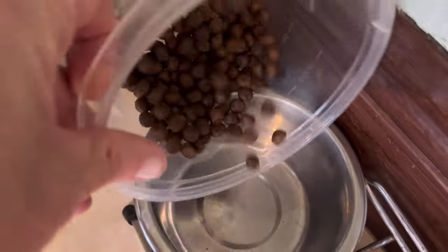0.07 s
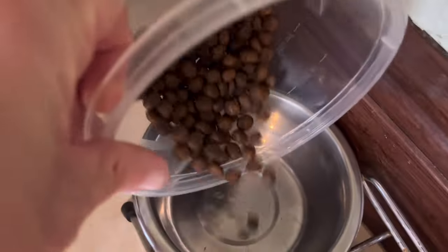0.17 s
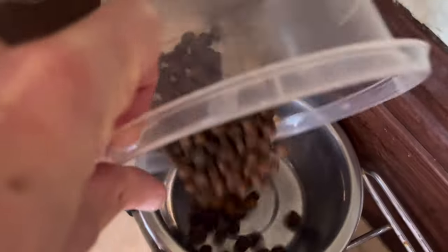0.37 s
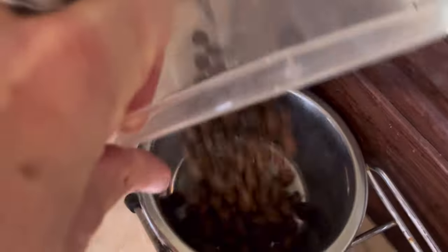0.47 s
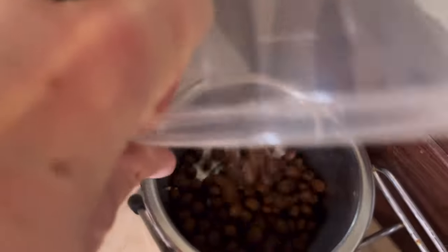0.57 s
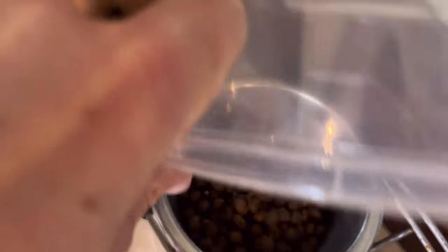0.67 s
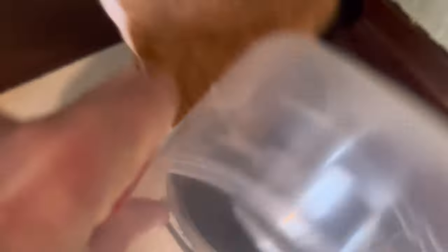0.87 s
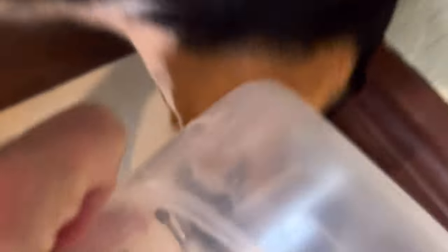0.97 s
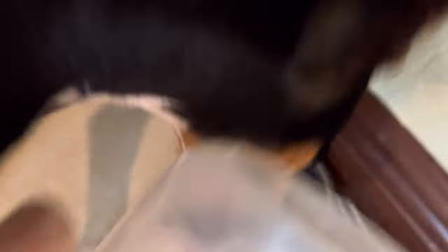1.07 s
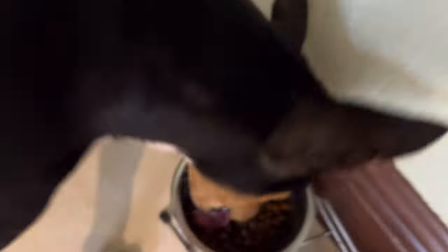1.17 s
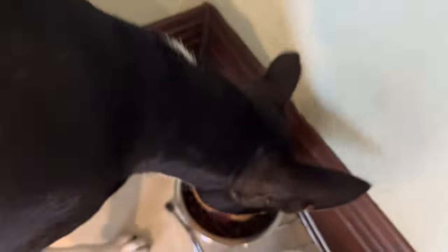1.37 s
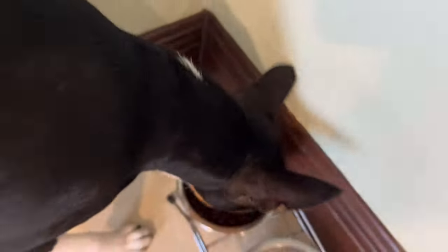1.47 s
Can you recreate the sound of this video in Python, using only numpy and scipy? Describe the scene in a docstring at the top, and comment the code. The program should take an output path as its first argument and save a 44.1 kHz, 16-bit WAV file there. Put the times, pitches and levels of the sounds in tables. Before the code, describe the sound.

Close up in a small room, dry pet food pours from a plastic container into a metal bowl with a ringing rattle. Light plastic ticks and soft thuds follow, then a few faint clicks as a dog stirs the food.

```python
"""In a small room, close by, dry kibble slides down a plastic tub and pours into a steel bowl.
The bare bowl rings until the growing heap damps it and only the rattle of pellet on pellet is left.
The tub is swung away with a few ticks and soft bumps, and a dog starts to nose through the food.
Faint room air, a low rumble and a hum lie underneath."""
import sys
import numpy as np
from scipy import signal
from scipy.fft import rfft, irfft
from scipy.io import wavfile
from scipy.ndimage import uniform_filter1d

SR = 44100
rng = np.random.default_rng(int(sys.argv[2]) if len(sys.argv) > 2 else 0)


def bounce(signal):
    """Save signal as a 16-bit WAV file at the path given by the first command-line argument."""
    frames = np.transpose(np.atleast_2d(signal))
    limited = np.clip(frames, -1, 1)
    pcm = np.round(limited * 32767).astype(np.int16)
    wavfile.write(sys.argv[1], SR, pcm)


N = 66150
T = np.arange(N) / SR

# How loud each sound is as time goes by. Each row: time in seconds, level in dB.
SLIDE_LEVEL = [(0, -27), (.05, -38.5), (.12, -29.5), (.2, -28), (.3, -27.5), (.55, -85), (.7, -70)]  # pellets sliding in the tub
RUMBLE_LEVEL = [(0, -42), (.32, -47), (.4, -62), (.75, -60.5), (.9, -37), (1.08, -47.5), (1.28, -44.5),
                (1.5, -48.5)]  # the low rumble and hum
HEAP_LEVEL = [(.277, -46), (.281, -21), (.31, -41), (.34, -28.5), (.38, -21), (.44, -19.5), (.51, -17.5),
              (.57, -20), (.645, -21), (.70, -34), (.77, -38), (1.05, -54)]  # pellets landing and settling
GRAZE_LEVEL = [(.277, -50), (.281, -20), (.31, -35), (.34, -21), (.38, -31.5), (.43, -24.5), (.5, -23),
               (.56, -27), (.64, -26.5), (.7, -45), (.78, -63)]  # pellets grazing each other
FILLED_LEVEL = [(.42, -60), (.52, -36), (.63, -30.5), (.72, -37.5), (.8, -39), (1.05, -56.5)]  # pellets shaking the filled bowl
STEEL_LEVEL = [(.279, 0.5), (.31, 5.5), (.34, 5.5), (.45, -1.5), (.52, -0.5), (.64, -8.5), (.72, -21.5)]  # pellets striking bare steel
RUMMAGE_LEVEL = [(1.24, -53), (1.29, -42.5), (1.315, -51), (1.34, -39.5), (1.4, -76), (1.43, -34),
                 (1.455, -51), (1.485, -35.5)]  # the dog stirring the food

# The tone of each sound, from bass to treble. Each row: frequency in Hz, relative level in dB.
SLIDE_TONE = [(88, -49), (150, -32), (204, -15), (401, -6.5), (714, 1), (1130, -1.5), (1490, -10),
              (2020, -0.5), (3750, -13), (6300, -18), (7940, -25.5), (11500, -24.5), (15000, -39)]
AIR_TONE = [(80, -33), (170, -8), (450, -18), (850, -6.5), (1200, -17), (4000, -22.5), (12500, -41.5),
            (15000, -57)]
RUMBLE_TONE = [(25, -50), (58, 1.5), (90, -2.5), (170, -13.5), (300, -15.5), (800, -46.5)]
HEAP_TONE = [(300, -56.5), (691, 4), (1130, -5), (1310, 3), (1470, -13.5), (2140, 7), (2690, -6.5),
             (2970, -4.5), (5800, 2), (7920, -4.5), (8600, -40), (9800, -7.5), (12900, -16), (15000, -34)]
GRAZE_TONE = [(3000, -40), (7000, -25), (8600, -16.5), (9900, 2), (10700, -14.5), (11600, 0), (12800, -3.5),
              (14200, -13.5), (15500, -52)]
SKID_TONE = [(300, -21), (600, 8), (2000, 0), (6000, -3.5), (11000, -7), (15500, -28)]
RUMMAGE_TONE = [(290, -56), (720, -32), (1140, 5), (1650, -5), (2100, -4.5), (4740, -11.5), (8250, -23.5),
                (11900, -26), (15000, -52)]

# The room's echo. Each row: frequency in Hz, fade time in seconds (the time to fall by 60 dB).
ROOM_FADE = [(150, 0.36), (5000, 0.44), (14000, 0.17)]
# Ticks of the plastic tub. Each row: start in seconds, level in dB, pitch in Hz.
TUB_TICKS = [(0.0177, -27, 730), (0.0928, -28.5, 2860), (.1278, -26, 2730), (0.1371, -28.5, 745),
             (0.222, -21.5, 2730), (0.2444, -15.5, 2580), (.817, -29.5, 2270), (0.908, -34, 2280),
             (.946, -31, 2230), (.973, -37, 2320), (1.0144, -36, 2470), (1.0385, -41, 2560),
             (1.119, -35.5, 650)]
# The tone of one tick. Each row: multiple of its pitch, relative level in dB.
TICK_TONE = [(.1, -11), (.48, 0), (.68, -6), (1, 6), (1.35, -4.5), (2, -15), (4.6, -23), (6, -43)]
# Hard single landings. Each row: start in seconds, level in dB, pitch the struck spot favours in Hz.
LANDINGS = [(.2795, -17, 1722), (.331, -20, 666), (.345, -21, 4700), (.399, -21, 2925), (.447, -21, 1722),
            (.469, -21, 1722), (.533, -21, 5800), (.583, -20, 666), (.6215, -15, 5856), (.68, -26, 941)]
# Dull notes of the filled bowl. Each row: pitch in Hz, relative level in dB.
FILLED_NOTES = [(1272, 9), (4430, 6.5), (5820, -4.5)]
# Which way the heap's rattle leans. Each row: frequency in Hz, left minus right in dB.
HEAP_BALANCE = [(700, -6), (1300, -2.5), (2200, -3), (4300, 4.5), (5700, 3), (7500, -2), (9800, 1.5),
                (12000, 4)]
# Notes of the bare bowl. Each row: pitch in Hz, relative level in dB, left minus right in dB.
STEEL_NOTES = [(666, -6, -7), (941, -10, -5), (1722, 2.5, -1), (2887, -6, -3), (2966, -7, 3),
               (3077, -9, -4), (4064, -3, 10), (4612, 0, 9), (4847, 0, 5), (5014, -5, -1), (5622, -11, 7),
               (5760, -8, -4), (5856, -2, 2), (6384, -7, 11), (7673, -11, 3), (7921, -12, 1)]
# Handling bumps. Each row: start in seconds, level in dB, final pitch in Hz, fade time in seconds.
BUMPS = [(0.841, -29.5, 62.2, 0.32), (.863, -21, 82.3, 0.13), (.916, -8.5, 88, 0.072),
         (0.97, -24, 62.7, 0.1)]
# Pellets knocked about by the dog. Each row: start in seconds, level in dB, pitch in Hz.
NUDGES = [(1.2834, -28.5, 2094), (1.3309, -33, 3320), (1.3576, -25, 4200), (1.396, -40, 1370),
          (1.4365, -35, 2160), (1.47, -34, 1145), (1.4965, -25.5, 1930)]

HEAP_PER_S, HEAP_SPREAD_DB = 1800, 1.5  # hits a second, and how much their strength varies


def amp(db):
    """Turns decibels into a number to multiply by."""
    return 10 ** (np.asarray(db) / 20)


def unit(x):
    """Scales a sound to an average power of 1."""
    return x / np.sqrt(np.mean(x ** 2) + 1e-20)


def read(points, hz):
    """Looks up a frequency in a table, giving every octave equal room."""
    row_hz, value = np.transpose(points)
    return np.interp(np.log(hz + 1), np.log(row_hz), value)


def level(points):
    """Turns a level table into a volume curve that dies away fast beyond its ends."""
    times, db = np.transpose(points)
    outside_s = abs(T - np.clip(T, times[0], times[-1]))
    return amp(np.interp(T, times, db) - 300 * outside_s)


def pan(db):
    """Left and right volumes; above 0 dB the sound leans left."""
    return amp(np.array([[db], [-db]]) / 2)


def add(mix, start_s, sound):
    """Mixes a sound in at a given time."""
    part = mix[:, max(round(start_s * SR), 0):][:, :sound.shape[-1]]
    part += sound[..., :part.shape[1]]


def widen(pair, width=1):
    """Makes left and right from a shared signal and one that is added left and taken away right."""
    middle, side = pair[0], width * pair[1]
    return np.array([middle + side, middle - side]) / np.sqrt(1 + width ** 2)


def ring_through(x, response):
    """Makes every sample of a sound set off the given response."""
    return signal.fftconvolve(x, np.atleast_2d(response), axes=1)[:, :N]


def colour(x, tone, peak_hz=1000, peak_db=0, peak_octaves=0.05, size=4096):
    """Gives a sound the tone in a table, with one narrow ringing peak if asked."""
    hz = abs(np.fft.fftfreq(size, 1 / SR))
    db = read(tone, hz) + peak_db / (1 + (np.log2((hz + 1) / peak_hz) / peak_octaves) ** 2)
    spectrum = np.exp(np.conj(signal.hilbert(np.log(amp(db)))))  # rings after a hit, never before
    response = np.fft.ifft(spectrum).real[:size // 2]
    return ring_through(x, response / np.linalg.norm(response))


def impacts(per_s, spread_db):
    """Random hits, a few harder than the rest, at a steady average power."""
    strength = amp(spread_db * np.minimum(rng.exponential(1, N), 3.5))
    hits = strength * rng.choice([-1, 1], N) * (rng.random(N) < per_s / SR)
    return hits / np.sqrt(abs(uniform_filter1d(hits ** 2, size=1500)) + 1e-6)


def patter(per_s, spread_db, spots=6):
    """Hits from scattered spots, each sounding a little different on the left and right."""
    out = np.zeros((2, N))
    hits, spot = impacts(per_s, spread_db), rng.integers(0, spots, N)
    for k in range(spots):
        here = hits * (spot == k)
        shifted = np.roll(here, (k + 1) * (-1) ** k) * (-1) ** (k // 2)
        out += widen([here, shifted])
    return out


def click(fade_s, size=3000):
    """A sharp contact and its brief chatter."""
    t = np.arange(size) / SR
    burst = rng.standard_normal((2, size)) * amp(-60 * t / fade_s)
    burst[0, 0] += 4  # the contact itself
    return unit(widen(burst)) * np.sqrt(SR / 200 / size)  # as much energy as 5 ms at power 1


def tub():
    """Pellets tumble down the plastic wall, which ticks dully."""
    out = colour(patter(per_s=1100, spread_db=1) * level(SLIDE_LEVEL), SLIDE_TONE)
    for start, db, hz in TUB_TICKS:
        tone = [(multiple * hz, tone_db) for multiple, tone_db in TICK_TONE]
        add(out, start, amp(db) * colour(click(fade_s=.022), tone))
    return out * pan(db=-2)


def background(air_db=-52.5, hum_hz=120.3):
    """Steady room air, plus a low rumble and faint hum that sink during the pour."""
    air, low = (widen(rng.standard_normal((2, N)), width=0.45) for _ in range(2))
    hum = amp(-4) * unit(np.sin(2 * np.pi * hum_hz * T))
    return amp(air_db) * colour(air, AIR_TONE) + level(RUMBLE_LEVEL) * (colour(low, RUMBLE_TONE) + hum)


def room_echo(x, delay_s=0.00226, size=256):
    """The walls send back a short blur of echoes whose highest treble dies first."""
    hz, t, noise = signal.stft(rng.standard_normal((2, SR // 2)), SR, nperseg=size)
    fade = amp(-60 * t / read(ROOM_FADE, hz)[:, None])
    tail = signal.istft(noise * fade, SR, nperseg=size)[1]
    tail = tail * (T[:tail.shape[1]] > delay_s)
    return ring_through(x, tail / np.linalg.norm(tail[0]))


def heap():
    """Pellets land on pellets with a rattle and graze each other with a crisp hiss."""
    hits = patter(HEAP_PER_S, HEAP_SPREAD_DB) * level(HEAP_LEVEL)
    for start, db, _ in LANDINGS:
        add(hits, start, amp(db) * click(fade_s=0.027))
    grazes = patter(HEAP_PER_S, HEAP_SPREAD_DB) * level(GRAZE_LEVEL)
    rattle = colour(hits, HEAP_TONE) + colour(grazes, GRAZE_TONE)
    out = steel_shimmer(rattle) + filled_bowl()
    lean_db = read(HEAP_BALANCE, np.fft.rfftfreq(N, 1 / SR))
    return irfft(rfft(out) * amp(np.array([lean_db, -lean_db]) / 2), N)


def steel_shimmer(x, relative_db=-8.5, fade_s=0.054):
    """The steel wall adds a crowd of close, quickly dying notes to a sound."""
    t = T[:SR // 8]
    ring = widen(rng.standard_normal((2, len(t)))) * amp(-60 * t / fade_s)
    shimmer = ring_through(x, ring / np.linalg.norm(ring[0]))
    return (x + amp(relative_db) * shimmer) / np.hypot(1, amp(relative_db))


def bare_bowl(ring_db=-24.5, damping_per_s=9, spot_octaves=.06):
    """Each pellet strikes another spot and sets the steel ringing; the growing heap damps it."""
    first_s = LANDINGS[0][0]
    hits = impacts(per_s=600, spread_db=2.5) * level(STEEL_LEVEL) * (T >= first_s)
    typical_hit = np.sqrt(SR / 600)
    first_hit = amp(18) * typical_hit * (np.arange(N) == round(first_s * SR))
    # This clock speeds up as the bowl fills, so the notes fade ever faster.
    fade_clock = np.cumsum(1 + damping_per_s * np.clip(T - first_s, 0, .5)) / SR
    out = np.zeros((2, N))
    for hz, db, side_db in STEEL_NOTES:
        empty_fade_s = .55 * (hz / 1e3) ** -.12  # high notes die sooner
        decay = np.minimum(np.log(1000) * fade_clock / empty_fade_s, 600)
        note = np.exp(2j * np.pi * hz * T - decay)
        push = hits * rng.standard_normal(N) + first_hit
        for start, hit_db, spot_hz in LANDINGS:
            off_pitch = np.log2(hz / spot_hz) / spot_octaves
            push[round(start * SR)] += amp(hit_db + 34) * typical_hit / (1 + off_pitch ** 2)
        ring = note * np.cumsum(push / abs(note))  # every push starts its own fade
        shift_s = .00009 * rng.uniform(-0.87, 0.51, (2, 1))  # left and right arrive slightly apart
        stereo = (ring * np.exp(2j * np.pi * hz * shift_s)).real
        out += amp(db) * unit(stereo * pan(side_db))
    return amp(ring_db) * unit(out)


def filled_bowl(fade_s=.025):
    """Weighed down with food, the bowl answers each hit with short, dull notes."""
    t = T[:SR // 4]
    fade = amp(-60 * t / fade_s)
    notes = sum(amp(db) * unit(fade * np.sin(2 * np.pi * hz * t)) for hz, db in FILLED_NOTES)
    hits = patter(HEAP_PER_S, HEAP_SPREAD_DB) * level(FILLED_LEVEL)
    return ring_through(hits, notes / np.linalg.norm(notes))


def skid(peak_s=.832, width_s=0.0067, db=-30.5):
    """A last pellet skids over the plastic in a quick run of tiny hits."""
    swell = amp(db) * np.exp(-.5 * ((T - peak_s) / width_s) ** 2)
    return colour(patter(HEAP_PER_S, HEAP_SPREAD_DB) * swell, SKID_TONE)


def bumps(rise_s=0.0056, drop_s=0.0034):
    """Handling makes soft, low thuds whose pitch drops at once."""
    out, t = np.zeros((2, N)), T[:SR // 4]
    side_radians = np.array([[.5], [-.5]])  # the left wave runs ahead of the right
    for start, db, hz, fade_s in BUMPS:
        cycles = np.cumsum(hz * (1 + 2.4 * np.exp(-t / drop_s))) / SR
        volume = amp(db - 60 * t / fade_s) * (1 - np.exp(-t / rise_s))
        add(out, start, -np.sin(2 * np.pi * cycles + side_radians) * volume)
    return out * pan(db=3.5)


def dog():
    """A muzzle pushes pellets around the full bowl, and a few of them click."""
    out = colour(patter(per_s=1100, spread_db=3) * level(RUMMAGE_LEVEL), RUMMAGE_TONE)
    for start, db, hz in NUDGES:
        add(out, start, amp(db) * colour(click(fade_s=.017), RUMMAGE_TONE, peak_hz=hz, peak_db=13))
    return out * pan(db=-0.5)


def scene(echo_db=-8):
    """Tub, bowl and dog echo in the room; the bumps and background are added without echo."""
    near = tub() + skid() + bare_bowl() + heap() + dog()
    return near + amp(echo_db) * room_echo(near) + bumps() + background()


def record(dry, peak_limit=.85, cutoff_hz=15000):
    """The recorder rounds off the highest peaks, then cuts the very top of the treble."""
    rounded = dry / (1 + (dry / peak_limit) ** 8) ** (1 / 8)
    low_pass = signal.firwin(255, cutoff_hz, window=("kaiser", 9), fs=SR)
    return signal.oaconvolve(rounded, low_pass[None], "same")


dry = scene()
out = record(dry)
bounce(out)
```